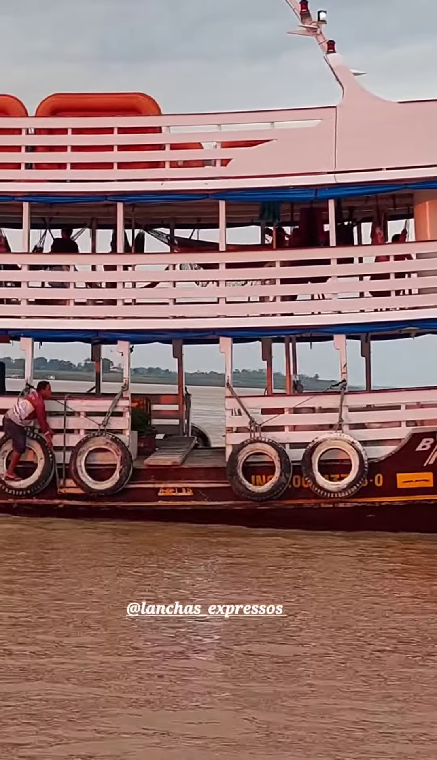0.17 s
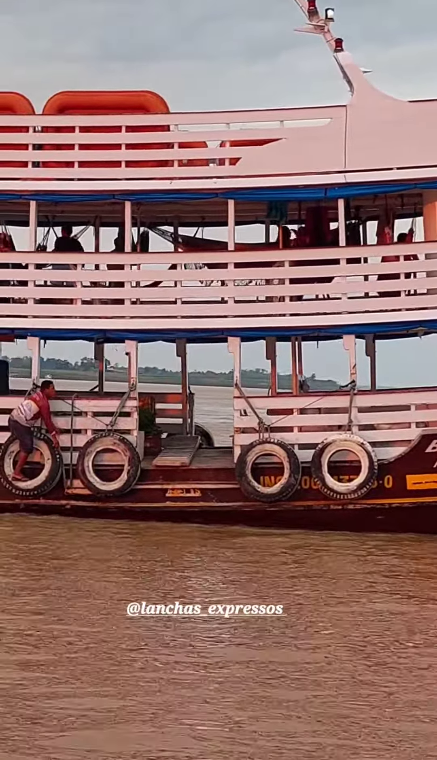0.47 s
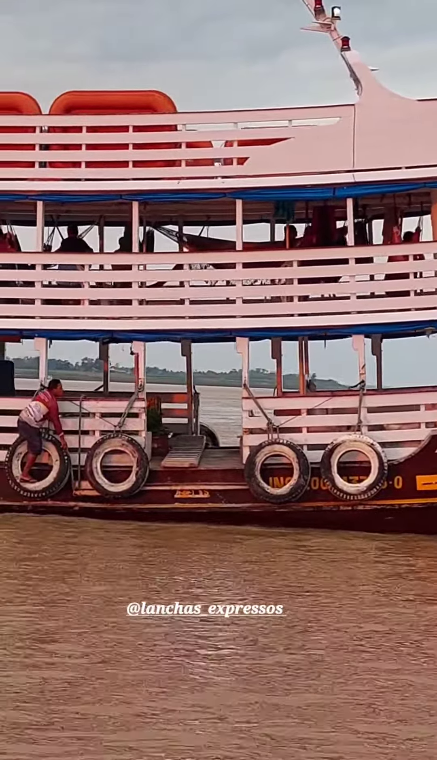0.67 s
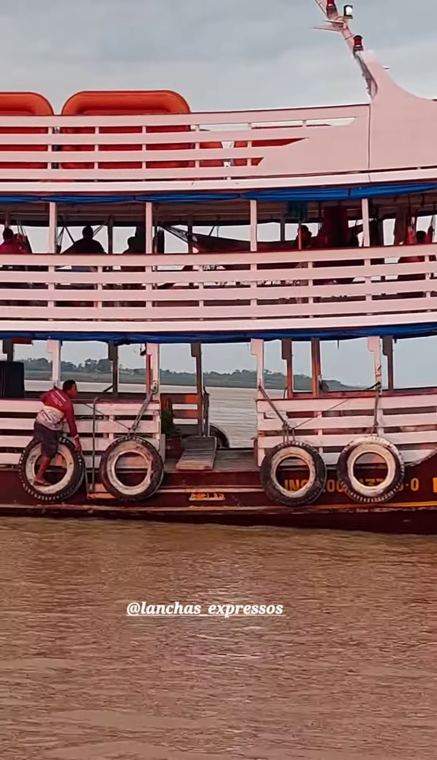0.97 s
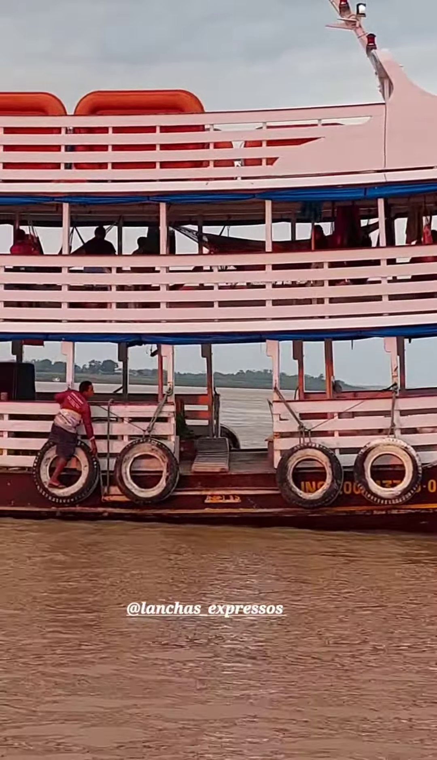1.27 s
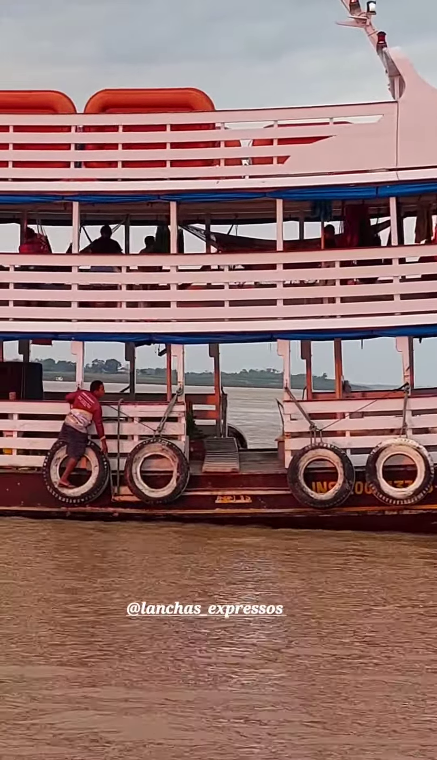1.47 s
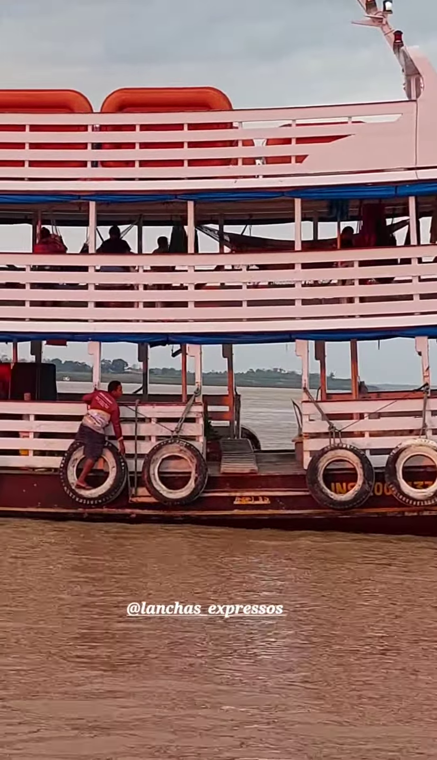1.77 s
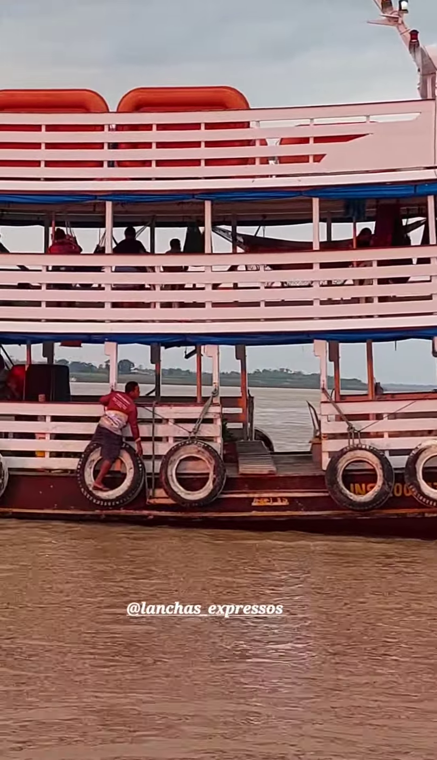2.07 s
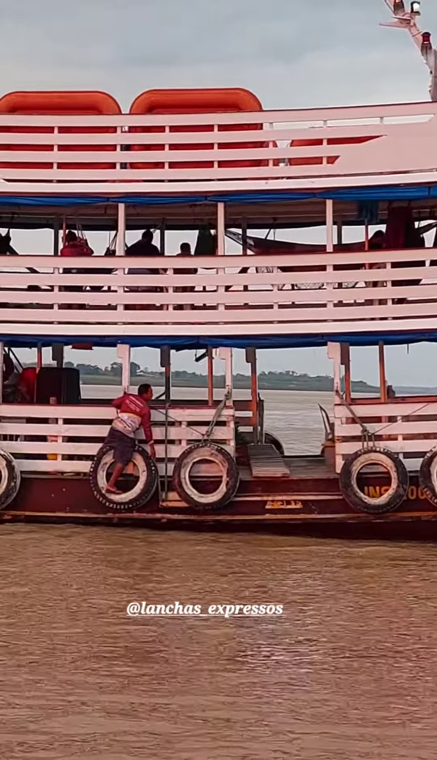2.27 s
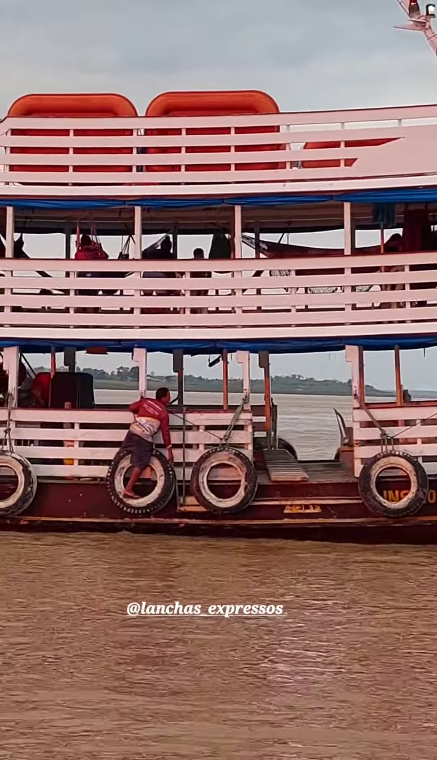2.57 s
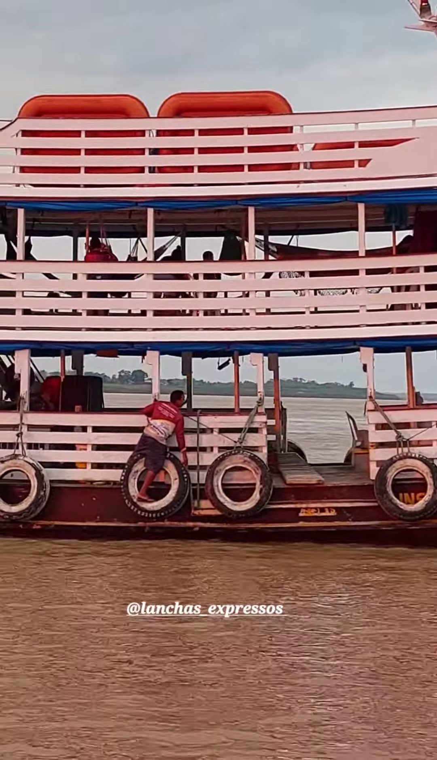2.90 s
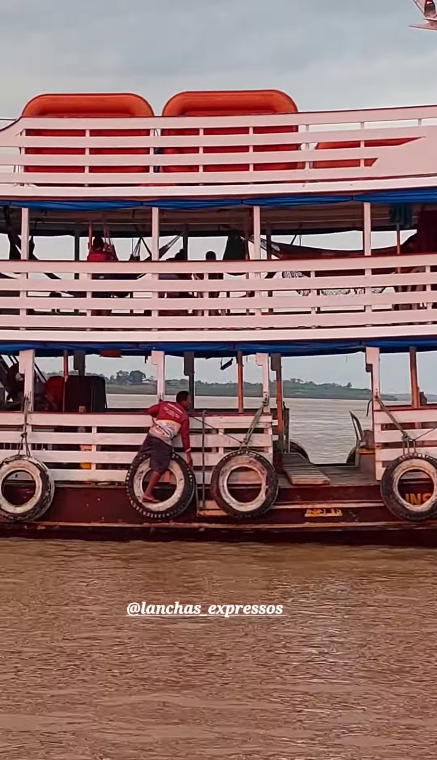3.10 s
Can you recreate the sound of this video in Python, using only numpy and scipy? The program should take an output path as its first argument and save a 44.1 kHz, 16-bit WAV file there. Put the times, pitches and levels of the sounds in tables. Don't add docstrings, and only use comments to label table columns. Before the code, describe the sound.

Rapid, regular diesel put-put from a passing wooden boat some way off, slightly swelling and changing tone. Close water hisses and drips more on the right, wavelets knock a hollow hull, picked up by a small stereo device.

```python
import sys
import numpy as np
from scipy import signal
from scipy.fft import rfft, irfft, next_fast_len
from scipy.io import wavfile

SR = 44100
rng = np.random.default_rng(int(sys.argv[2]) if len(sys.argv) > 2 else 0)


def volts_from_decibels(level):
    exponent = np.asarray(level, float) / 20
    return 10 ** exponent


def file_out(sig):
    cols = np.atleast_2d(sig).T
    lim = np.clip(cols, -1, 1)
    pcm = np.round(lim * 32767).astype(np.int16)
    wavfile.write(sys.argv[1], SR, pcm)


N = 142884

# start_s, level_db, tilt_db (upper pipe mode against the one below)
ENGINE_LOAD = [
    (0, -0.3, -0.5),
    (.5, -0.2, -0.4),
    (1.0, 1.5, -1.5),
    (1.3, -0.1, 0.5),
    (1.65, 0, -3),
    (2.0, -0.1, -2),
    (2.3, 1, -1),
    (2.7, 0.5, -3),
    (3.24, .5, -0.5),
]
# pitch_hz, level_db, t60_s
PIPE_MODES = [
    (59.2, -25, 0.71),
    (104.7, -6, .093),
    (185.8, -17, 0.082),
    (250.5, -21.5, 0.9),
    (315.6, -9.5, 0.095),
]
MODE_SIGNS = [-1, 1, -1, -1, 1]
MODE_TILT = [0, 0, 0, -1, 1]
# delay_s, share
THUMP_ECHOES = [
    (.0138, 0.54),
    (0.0308, 0.091),
]
# low_hz, high_hz, late_s, decay_s, left_db, right_db
PUFF_BANDS = [
    (60, 220, .008, .03, -35, -32),
    (220, 400, .007, .025, -33, -30),
    (500, 1000, .0058, .006, -31, -31),
    (1000, 1600, .005, .005, -32, -25),
    (1650, 2600, .0045, .0035, -35, -23),
    (2600, 4500, .0036, .003, -38, -34),
    (4500, 7500, .0034, .0018, -29, -31),
    (8000, 15500, .0034, .003, -56, -52),
]
# start_s, level_db
WATER_SURGE = [(0, -42.5), (.12, -40), (.35, -47.5), (.85, -51.5), (1.15, -46), (1.4, -43), (1.6, -46),
               (1.72, -37.5), (1.82, -44), (2.03, -43.5), (2.11, -37.5), (2.2, -45.5), (2.4, -44.5),
               (2.49, -39.5), (2.58, -46.5), (2.68, -43.5), (2.85, -50), (3.24, -53)]
# pitch_hz, level_db (per hz)
WASH_COLOUR_LEFT = [(35, -53), (90, -51.5), (330, -62.5), (700, -79), (2500, -80), (6500, -97),
                    (8700, -110), (15500, -121)]
# pitch_hz, level_db (per hz)
WASH_COLOUR_RIGHT = [(35, -45), (90, -50.5), (330, -61.5), (700, -65), (2500, -75.5), (6500, -77.5),
                     (8500, -93), (14000, -81)]
# pitch_hz, share
SURGE_SHARE = [(200, 0.05), (1000, 0.43), (4000, 0.75), (10000, 1)]
# pitch_hz, share
PORT_LIKENESS = [(100, .9), (350, .85), (600, .8), (3000, .7), (7000, .5), (10000, .05)]
# start_s, level_db (peak)
SPRAY_TICKS = [(0.1595, -48), (0.4389, -43), (0.7178, -42), (0.8899, -41), (1.0989, -39), (1.206, -38),
               (1.2256, -58), (1.3119, -51.5), (1.387, -33.5), (1.533, -57), (1.5724, -37), (1.7694, -37),
               (1.8913, -36), (2.169, -33), (2.2822, -57), (2.3356, -35.5), (2.472, -32), (2.664, -32.5),
               (2.754, -41), (2.8095, -38), (3.0703, -39.5), (3.1612, -46)]
# middle_s (less half the length), level_db, pitch_hz, length_s
NEAR_SPLASHES = [
    (2.095, -35, 5000, .035),
    (2.11, -31, 1500, .02),
    (2.172, -40, 10000, .008),
    (2.48, -37, 5000, .03),
    (2.481, -34, 900, .025),
]
# start_s, level_db, pitch_hz, t60_s
SINGLE_DRIPS = [
    (.06, -25, 780, .08),
    (.061, -24, 3250, .04),
    (.977, -38, 7300, .03),
    (2.028, -27, 3300, .035),
    (2.108, -27, 5500, .03),
    (2.126, -23, 800, .035),
    (2.193, -32, 4600, .02),
    (2.493, -30, 4700, .03),
    (2.716, -30, 1800, .03),
    (3.133, -32, 3700, .03),
]
# start_s, level_db
HULL_KNOCKS = [
    (1.627, -9.5),
    (1.643, -15),
    (1.692, -5),
    (1.724, -10),
    (1.756, -16),
    (2.118, -24),
]
# pitch_hz, width_hz, boost_db (negative cuts)
PORT_PEAKS_LEFT = [(444, 290, -2), (788, 106, 6.5), (1110, 260, 10.5), (1473, 95, 9), (4170, 2500, 8),
                   (5590, 1080, 12), (6560, 420, 14), (8240, 3170, -25.5)]
# pitch_hz, width_hz, boost_db (negative cuts)
PORT_PEAKS_RIGHT = [(518, 125, -3), (1395, 425, 12.5), (1627, 600, -9), (1844, 132, 11.5), (2087, 114, 7.5),
                    (5000, 1800, 2), (6180, 370, -5.5), (6830, 460, 3), (15570, 1400, -19)]

FIRST_FIRING_S, FIRING_PERIOD_S = 0.01042, 0.069964
VALVE_SOFT_HZ, FIRING_SPREAD_DB, MODE_SPREAD_DB, THUMP_PAN_DB = 600, 0.4, 0.8, 1.8
PUFF_RISE_S, PUFF_SPREAD_DB, PUFF_TAIL_S, PUFF_TAIL_DB = 0.0012, 2.6, 0.025, -20
LEFT_LAG_S, LAG_ABOVE_HZ = 0.00043, 450
DROPS_PER_S, DROP_DB, DROP_SPREAD_DB = 350, -48, 3.2
DROP_LEFT_DB, DROP_RIGHT_DB = -12, 3
DRIP_RISE_PER_S = 6
KNOCK_HZ, KNOCK_T60_S = 121.5, 0.19
BASS_CUT_HZ, TOP_CUT_HZ = 68.5, 15730


def at_hz(points, hz):
    table_hz, values = np.transpose(points)
    return np.interp(np.log(hz + 1e-9), np.log(table_hz), values)


def swing(rows):
    db = np.interp(np.arange(N) / SR, *np.transpose(rows)[:2])
    return db - db.mean()


def drift(rate_hz):
    r = np.exp(-2 * np.pi * rate_hz * 40 / SR)
    slow = signal.lfilter([1], [1, -2 * r, r * r], rng.standard_normal(N // 40 + 2002))[2000:]
    return np.interp(np.arange(N) / 40, np.arange(len(slow)), slow / slow.std())


def ring(clicks, hz, t60):
    r = volts_from_decibels(-60 / (t60 * SR))
    w = 2 * np.pi * hz / SR
    return signal.lfilter([0, np.sin(w)], [1, -2 * r * np.cos(w), r * r], clicks + 1e-18)


def fade(x, seconds):
    return signal.lfilter([1], [1, -np.exp(-1 / (seconds * SR))], x + 1e-18)


def clicks_at(s, sizes):
    out = np.zeros(N + 2 * SR)
    places = (np.asarray(s) * SR).round().astype(int) + SR
    np.add.at(out, places, sizes)
    return out[:N + SR]


def band_pass(x, low_hz, high_hz):
    return signal.sosfilt(signal.butter(3, [low_hz, high_hz], "band", fs=SR, output="sos"), x)


def pair(hz):
    shared, *own = rng.standard_normal((3, N))
    alike = np.clip(at_hz(PORT_LIKENESS, hz), 0, 1)
    lag = int(LEFT_LAG_S * SR) if hz > LAG_ABOVE_HZ else 0
    late = np.roll(shared, lag)
    return np.sqrt(alike) * np.array([late, shared]) + np.sqrt(1 - alike) * np.array(own)


def firings():
    return FIRST_FIRING_S + FIRING_PERIOD_S * np.arange(-6, 47)


def thump():
    s = firings()
    chance = rng.standard_normal((len(s), 1 + len(PIPE_MODES)))
    load_s, _, load_tilt_db = np.transpose(ENGINE_LOAD)
    tilt_db = np.interp(s, load_s, load_tilt_db)
    pipe = 0
    for k, (hz, db, t60) in enumerate(PIPE_MODES):
        firing_db = db + MODE_TILT[k] * tilt_db
        firing_db = firing_db + FIRING_SPREAD_DB * chance[:, 0] + MODE_SPREAD_DB * chance[:, k + 1]
        pipe = pipe + MODE_SIGNS[k] * ring(clicks_at(s, volts_from_decibels(firing_db)), hz, t60)
    r = np.exp(-2 * np.pi * VALVE_SOFT_HZ / SR)
    pipe = signal.lfilter([(1 - r) ** 2], [1, -2 * r, r * r], pipe)
    echoes = sum(share * np.roll(pipe, int(delay * SR)) for delay, share in THUMP_ECHOES)
    return (pipe + echoes)[SR:] * volts_from_decibels(THUMP_PAN_DB * np.array([[-1], [1]]))


def puffs():
    out, s = 0, firings()
    chance = rng.standard_normal((len(s), 1 + len(PUFF_BANDS)))
    for k, (low_hz, high_hz, late, decay, left_db, right_db) in enumerate(PUFF_BANDS):
        size_db = PUFF_SPREAD_DB * (0.2 * chance[:, 0] + 0.4 * chance[:, k + 1])
        hits = fade(clicks_at(s + late, volts_from_decibels(size_db)), PUFF_RISE_S) / (PUFF_RISE_S * SR)
        shape = fade(hits, decay) + volts_from_decibels(PUFF_TAIL_DB) * fade(hits, PUFF_TAIL_S)
        gas = band_pass(pair(np.sqrt(low_hz * high_hz)), low_hz, high_hz)
        out = out + gas / gas.std() * shape[SR:] * volts_from_decibels(np.array([[left_db], [right_db]]))
    return out


def wash(surge_db, patchy_db):
    size = next_fast_len(N)
    hz = np.arange(size // 2 + 1) * SR / size
    colour_db = np.array([at_hz(WASH_COLOUR_LEFT, hz), at_hz(WASH_COLOUR_RIGHT, hz)])
    colour = volts_from_decibels(colour_db) * np.sqrt(SR / 2)
    out, together = 0, drift(14.6)
    for centre_hz in 25 * 2 ** np.arange(0, 10, 0.5):
        window = np.cos(np.pi * np.clip(np.log2(hz / centre_hz + 1e-9), -0.5, 0.5))
        band = irfft(rfft(pair(centre_hz), size) * window * colour, size)[:, :N]
        share = np.clip(at_hz(SURGE_SHARE, centre_hz), 0, 1.5)
        flicker_db = 1.14 * patchy_db * drift(60)
        out = out + band * volts_from_decibels(share * (surge_db + patchy_db * together) + flicker_db)
    return out


def random_drops(surge_db):
    sizes = volts_from_decibels(DROP_DB + DROP_SPREAD_DB * np.minimum(rng.exponential(1, N), 3))
    sizes = sizes * rng.choice([-1, 1], N)
    born = rng.random(N) < DROPS_PER_S * volts_from_decibels(2 * surge_db) / SR
    pitch_number = rng.integers(0, 18, N)
    out = np.zeros(N)
    for k, hz in enumerate(np.geomspace(1500, 14500, num=18)):
        out += ring(sizes * born * (pitch_number == k), hz, 16 / hz)
    return out


def drips():
    t, out = np.arange(N) / SR, np.zeros(N)
    for s, db, hz, t60 in SINGLE_DRIPS:
        age = np.clip(t - s, 0, 2 * t60)
        height = volts_from_decibels(db - 60 * age / t60) * (1 - np.exp(-age / 0.00034))
        tone = np.sin(2 * np.pi * hz * age * (1 + DRIP_RISE_PER_S * age / 2))
        out += height * tone * (age < 2 * t60)
    return out


def splashes():
    t, out = np.arange(N) / SR, np.zeros(N)
    ticks = [(s + 0.00046, db + 4, 13000, 0.002) for s, db in SPRAY_TICKS]
    for s, db, hz, length in [*NEAR_SPLASHES, *ticks]:
        burst = band_pass(rng.standard_normal(N), hz * 0.74, hz * 1.35)
        shape = np.exp(-(2 * (t - s - length / 2) / length) ** 2)
        out += volts_from_decibels(db) * burst / burst.std() * shape
    return out


def droplets(surge_db):
    water = random_drops(surge_db) + drips() + splashes()
    return water * volts_from_decibels(np.array([[DROP_LEFT_DB], [DROP_RIGHT_DB]]))


def knocks():
    s, db = np.transpose(HULL_KNOCKS)
    slaps = fade(clicks_at(s, volts_from_decibels(db)), 0.0013) / (0.0022 * SR)
    body = ring(slaps, KNOCK_HZ, KNOCK_T60_S)
    return body[SR:] * volts_from_decibels(np.array([[-1], [1]]))


def scene():
    surge_db = swing(WATER_SURGE)
    engine = volts_from_decibels(swing(ENGINE_LOAD)) * (thump() + puffs())
    return engine + wash(surge_db, patchy_db=1.44) + droplets(surge_db) + knocks()


def port(x, peaks):
    for hz, width_hz, db in peaks:
        w, g = 2 * np.pi * hz / SR, volts_from_decibels(db / 2)
        a = np.sin(w) * width_hz / hz / 2
        middle = -2 * np.cos(w)
        x = signal.lfilter([1 + a * g, middle, 1 - a * g], [1 + a / g, middle, 1 - a / g], x)
    return x


def low_pass(x):
    return signal.sosfilt(signal.butter(12, 15730, fs=SR, output="sos"), x)


def record(dry):
    x = np.array([port(dry[0], PORT_PEAKS_LEFT), port(dry[1], PORT_PEAKS_RIGHT)])
    r = np.exp(-2 * np.pi * BASS_CUT_HZ / SR)
    x = signal.lfilter([1, -2, 1], [1, -2 * r, r * r], x)
    x = signal.sosfilt(signal.ellip(8, 0.5, 22, TOP_CUT_HZ, fs=SR, output="sos"), x)
    return low_pass(x)


dry = scene()
out = record(dry)
file_out(out)
```